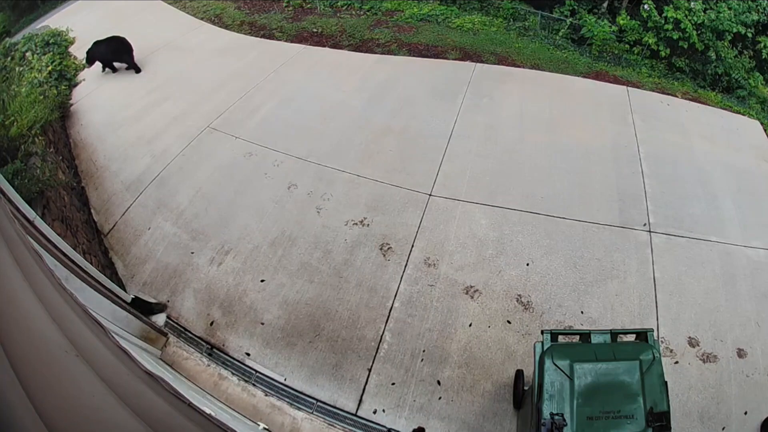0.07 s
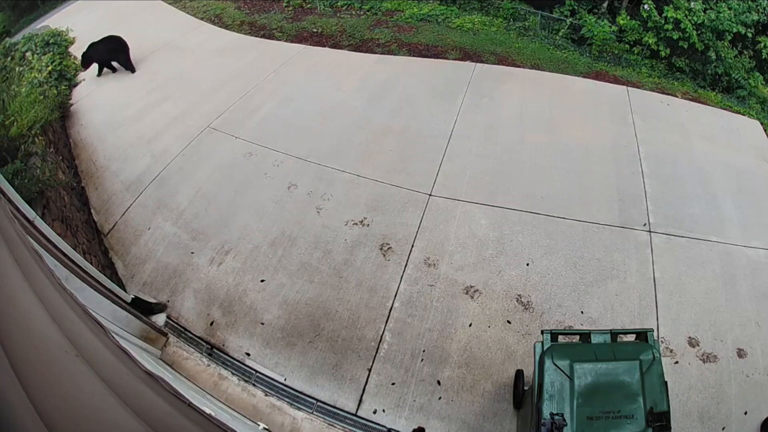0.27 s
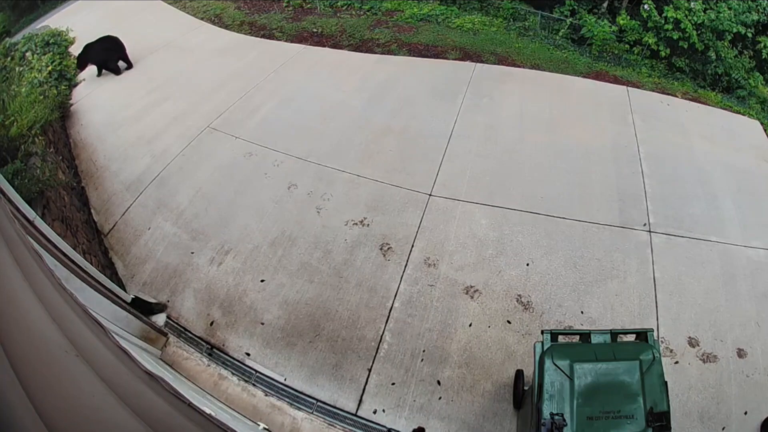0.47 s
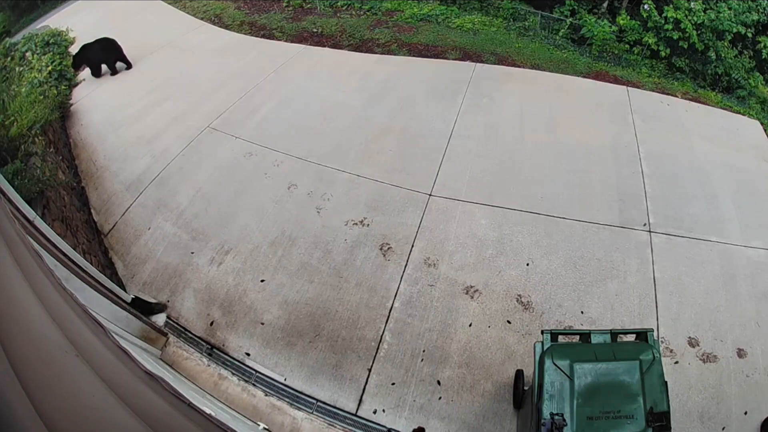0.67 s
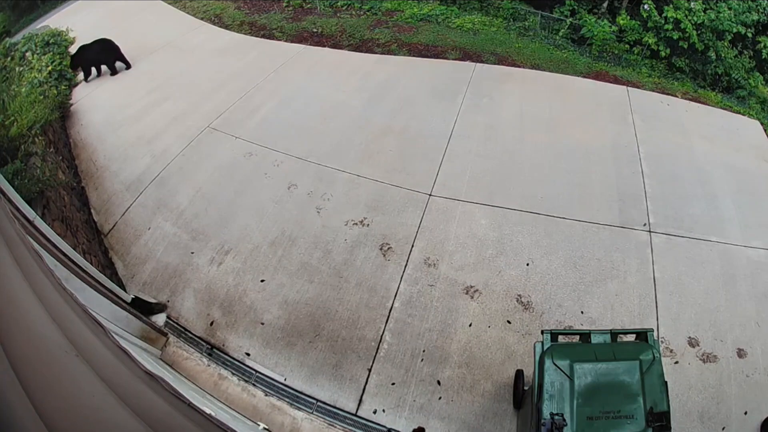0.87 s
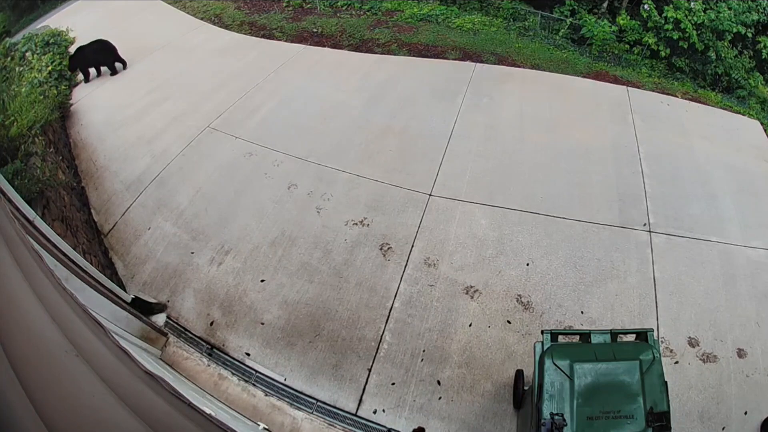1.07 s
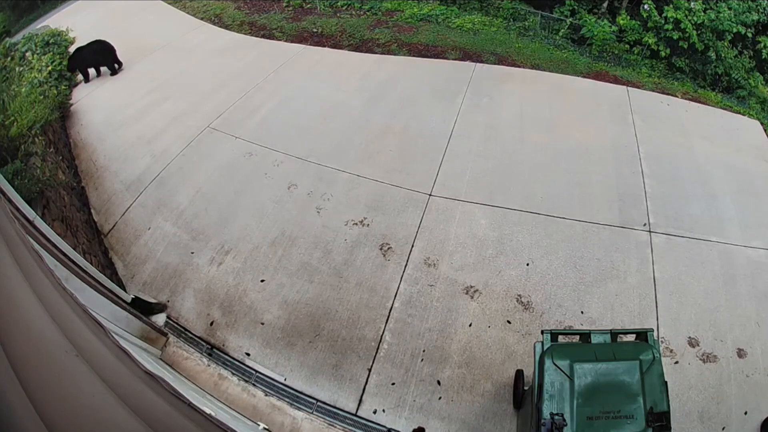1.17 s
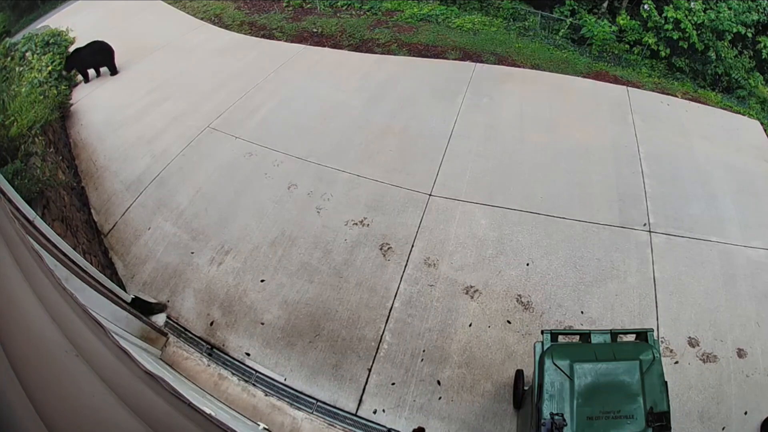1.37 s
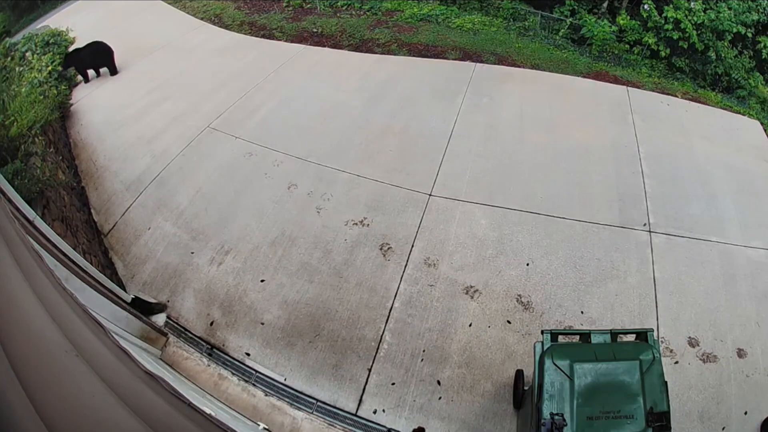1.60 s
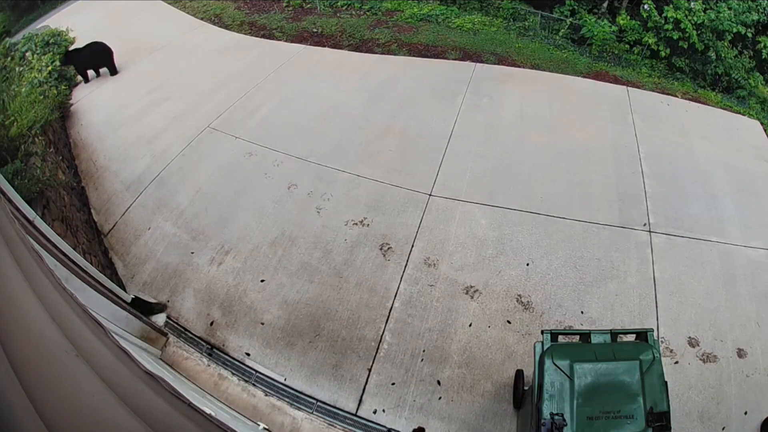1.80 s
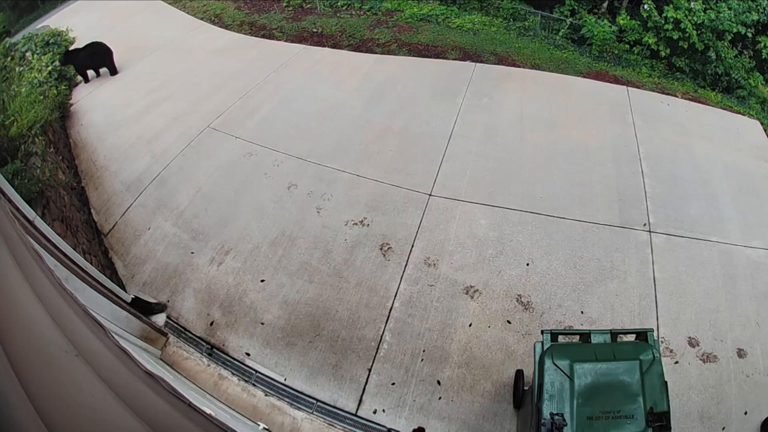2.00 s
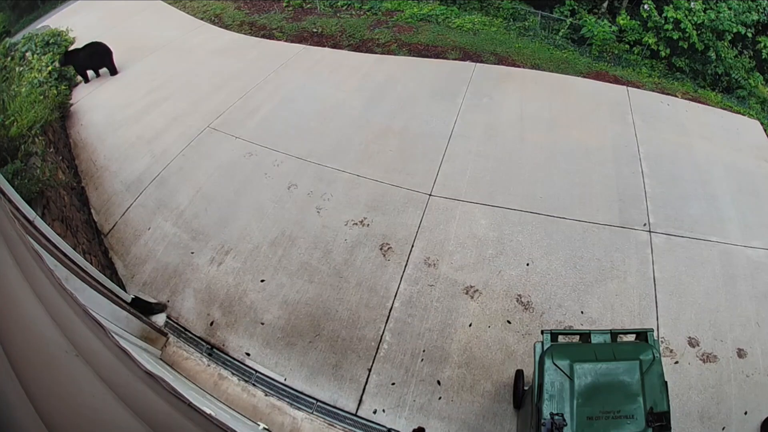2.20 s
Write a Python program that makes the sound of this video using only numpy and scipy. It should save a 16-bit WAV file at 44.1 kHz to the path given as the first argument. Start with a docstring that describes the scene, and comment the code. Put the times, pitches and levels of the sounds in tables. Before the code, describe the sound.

A songbird sings a quick four-note phrase four times, starting at about 0.2, 0.6, 1.0 and 1.4 seconds: a level whistle, a thin high note, a sharp downward slur and a low falling note. A second bird gives short, very high chips near 1.1 and 1.8 seconds. Soft outdoor hiss and a light echo from the trees swell with the song and sink away at around 2 seconds.

```python
"""Beside a concrete driveway, a songbird repeats a four-note phrase: level whistle, thin high note,
sharp downslur, low falling note. A second bird gives short high chips. Each note is a nearly pure tone,
modulated in frequency and amplitude. House and concrete return early reflections; trees scatter a long
reverberation. This and a soft outdoor hiss swell with the song and sink away after it."""
import sys
import numpy as np
from scipy import signal
from scipy.fft import rfft, irfft
from scipy.io import wavfile
from scipy.ndimage import uniform_filter1d

SR = 44100
rng = np.random.default_rng(int(sys.argv[2]) if len(sys.argv) > 2 else 0)


def transcribe(signal):
    """Save signal, clipped to [-1, 1], as a 16-bit WAV file at the path in sys.argv[1]."""
    frames = np.atleast_2d(signal).T
    limited = np.clip(frames, -1, 1)
    pcm = np.round(limited * 32767).astype(np.int16)
    wavfile.write(sys.argv[1], SR, pcm)


N = 99225

# Spectrum of the outdoor air noise: f/Hz, relative spectral level/dB
AIR_SPECTRUM = [(25, -1), (60, 3.5), (110, 4), (160, 3), (220, -0.5), (400, -3.5), (800, 2.5), (1600, -1.5),
                (2600, -0.5), (4000, -4), (4800, 0), (7500, -7.5), (8500, -18), (8900, -33.5)]
# Faint steady tones: f/Hz, level before the swell/dB
HUM_TONES = [(158, -77.5), (1634, -77.5)]
# Slow contour added to the swell of the background: t/s, gain/dB
BACKGROUND_CONTOUR = [(0, -7), (.195, -8), (.235, 2.5), (.6, -1), (1.0, 1), (1.65, 0), (1.80, -1.5),
                      (1.92, 3), (2.0, -4.5), (2.13, -12.5), (2.25, -20.5)]
# Calls of the second bird: onset t/s, level/dB
CHIP_CALLS = [(0.487, -55.5), (1.137, -36.5), (1.184, -53), (1.798, -39.5)]
# One chip, flicking up and down in pitch: t/s from its onset, f/Hz, relative level/dB
CHIP_GLIDE = [(0, 5857, -9), (.003, 6576, -8), (.007, 5850, 5), (.010, 7470, 2), (.014, 5896, -2),
              (.018, 7320, -1.5), (.023, 5980, 0.5), (.028, 7200, -8), (.036, 6160, -19)]
# Three of the songbird's notes: t/s into the phrase, f/Hz, relative level/dB
WHISTLE_GLIDE = [(.003, 2560, -20), (.013, 2680, -7), (.022, 2820, 0), (.036, 2820, 0), (.046, 2740, -8),
                 (.058, 2620, -5), (.069, 2810, 1), (.077, 2790, -4), (.092, 2780, -18)]
HIGH_GLIDE = [(.102, 4130, -3.5), (.116, 4360, -2), (.128, 4530, 0.5), (.142, 4413, -7.5),
              (.155, 4370, -19)]
LOW_GLIDE = [(.241, 2523, -5), (.251, 2371, -2), (.265, 2137, -5), (.295, 2142, -3.5), (.320, 2155, -4),
             (.338, 2170, -17.5)]
# Its downslur: t/s from the slur's onset, f/Hz, relative level/dB
SLUR_GLIDE = [(-.008, 3830, -22), (0, 3850, -18), (.004, 3660, 2.5), (.008, 3340, -4), (.013, 3130, -9),
              (.021, 2760, -4.5)]
# Phrases: onset t/s, whistle level/dB, whistle crescendo/dB, high note level/dB, slur onset t/s into
# the phrase, slur level/dB, low note level/dB, low note crescendo/dB, low note shift f/Hz
SONG_PHRASES = [(-.235, -65, -4, -82, 0.22, -70, -61, 15.5, -43),
                (0.183, -40.5, 10, -52, .168, -37, -47.5, -2, -1.5),
                (0.597, -37.5, 1, -57, 0.17, -39.5, -46.5, 4, 0),
                (1.017, -41, -4, -48.5, .170, -37, -47, -13, 12.5),
                (1.432, -41, 16, -49, .173, -36.5, -53, -2.5, -20)]


def from_db(db):
    """Amplitude ratio of a level: a factor of ten for every 20 dB."""
    return 10 ** (np.asarray(db) / 20)


def unit_rms(x):
    """Normalisation to a root-mean-square value of one."""
    return x / np.sqrt(np.mean(x ** 2) + 1e-20)


def short_term_power(x):
    """Mean square over a sliding window of 16 ms."""
    return np.abs(uniform_filter1d(x ** 2, size=700)) + 1e-14


def drift(count, cutoff_hz):
    """Low-pass filtered noise: smooth random motion with a spread of about one."""
    low_pass = signal.butter(2, cutoff_hz, fs=SR, output="sos")
    return unit_rms(signal.sosfilt(low_pass, rng.standard_normal(SR)))[:count]


def reflections(db, t60_s, per_s):
    """Impulse response of diffuse scattering: random arrivals that decay exponentially."""
    t = np.arange(SR) / SR
    arrivals = rng.random(SR) < per_s / SR
    taps = arrivals * rng.standard_normal(SR) * from_db(-60 * t / t60_s)
    return from_db(db) * taps / np.sqrt(np.sum(taps ** 2) + 1e-20)


def outdoor_noise(hiss_hz=5670, hiss_width_hz=956):
    """Superposition of broadband air noise, a band of high hiss and faint hums."""
    hz, db = np.transpose(AIR_SPECTRUM)
    bin_hz = np.arange(N // 2 + 1) * SR / N
    colour = from_db(np.interp(np.log(bin_hz + 1), np.log(hz), db))
    air = unit_rms(irfft(rfft(rng.standard_normal(N)) * colour, N))
    edges_hz = [hiss_hz - hiss_width_hz / 2, hiss_hz + hiss_width_hz / 2]
    band = signal.butter(3, edges_hz, "band", fs=SR, output="sos")
    hiss = unit_rms(signal.sosfilt(band, rng.standard_normal(N)))
    t = np.arange(N) / SR
    hums = sum(from_db(level) * np.sqrt(2) * np.sin(2 * np.pi * f * t) for f, level in HUM_TONES)
    return from_db(-59) * air + from_db(-56) * hiss + hums


def swell(birds, reference_db=-42, share=0.36, floor_db=-9.5):
    """Envelope following: the background's gain rises with the notes and falls back between them."""
    t = np.arange(N) / SR
    song_db = 10 * np.log10(short_term_power(birds))
    release_db = 386.5 * t
    held_db = np.maximum.accumulate(song_db + release_db) - release_db  # each peak decays linearly in dB
    follow_db = np.maximum(share * (held_db - reference_db), floor_db)
    return from_db(follow_db + np.interp(t, *np.transpose(BACKGROUND_CONTOUR)))


def tree_reverberation(x, dull_hz=2290, lift_below_hz=2390):
    """Scattering among trees leaves a long, dull tail; the lowest notes carry furthest."""
    tail = signal.fftconvolve(x, reflections(db=-4.5, t60_s=0.89, per_s=3000))[:N]
    hz = np.arange(N // 2 + 1) * SR / N
    lift_db = 4 * np.clip((lift_below_hz - hz) / 100, 0, 1)
    return irfft(rfft(tail) * from_db(lift_db) / np.hypot(1, hz / dull_hz), N)


def yard_reflections(x, echo_db):
    """Multipath propagation: early reflections from house and concrete join the direct sound."""
    response = from_db(echo_db) * reflections(db=-1, t60_s=0.16, per_s=1000)
    response[0] += 1  # direct path
    return signal.fftconvolve(x, response)


def bird_note(glide, onset_s, peak_db, jitter, echo_db, crescendo_db=0, shift_hz=0):
    """A frequency- and amplitude-modulated tone across the yard; jitter is a fraction of its pitch."""
    times, hz, level_db = np.transpose(glide)
    t = np.arange(times[0], times[-1], 1 / SR)
    pitch_hz = (np.interp(t, times, hz) + shift_hz) * (1 + jitter * drift(len(t), cutoff_hz=310))
    phase = 2 * np.pi * np.cumsum(pitch_hz) / SR
    tone = np.sin(phase) + from_db(-39.5) * np.sin(2 * phase)  # faint second harmonic
    flutter_db = 4.5 * drift(len(t), cutoff_hz=94)
    envelope = from_db(np.interp(t, times, level_db) + np.linspace(0, crescendo_db, len(t)) + flutter_db)
    fades = np.clip(np.minimum(t - times[0], times[-1] - t) / 0.0014, 0, 1)  # 1.4 ms at each end
    heard = yard_reflections(envelope * fades * tone, echo_db)
    heard = heard * from_db(peak_db) / np.sqrt(short_term_power(heard).max())
    first_sample = int((onset_s + times[0]) * SR)
    return np.interp(np.arange(N) - first_sample, np.arange(len(heard)), heard, left=0, right=0)


def chipping_bird():
    """Rapid, irregular frequency modulation makes these short, very high calls sound rough."""
    chips = sum(bird_note(CHIP_GLIDE, onset_s, db, jitter=0.055, echo_db=-1) for onset_s, db in CHIP_CALLS)
    return signal.sosfilt(signal.butter(6, 5000, "high", fs=SR, output="sos"), chips)


def songbird():
    """Frequency glides form four notes, repeated in every phrase at different levels."""
    song = np.zeros(N)
    for onset_s, whistle_db, rise_db, high_db, slur_s, slur_db, low_db, low_rise_db, low_hz in SONG_PHRASES:
        song += bird_note(WHISTLE_GLIDE, onset_s, whistle_db, jitter=0.018, echo_db=0.5,
                          crescendo_db=rise_db)
        song += bird_note(HIGH_GLIDE, onset_s, high_db, jitter=0.013, echo_db=5.5)
        song += bird_note(SLUR_GLIDE, onset_s + slur_s, slur_db, jitter=0.03, echo_db=1)
        song += bird_note(LOW_GLIDE, onset_s, low_db, jitter=0.012, echo_db=5.5,
                          crescendo_db=low_rise_db, shift_hz=low_hz)
    return song


def scene():
    """Superposition of both birds and a background of noise and reverberation that swells with them."""
    birds = songbird() + chipping_bird()
    background = outdoor_noise() + tree_reverberation(birds)
    return (birds + swell(birds) * background)[None]


def record(dry, cutoff_hz=9000):
    """Band limiting: a small microphone cuts off the highest treble steeply."""
    return signal.sosfilt(signal.ellip(10, .3, 70, cutoff_hz, fs=SR, output="sos"), dry)


dry = scene()
out = record(dry)
transcribe(out)
```